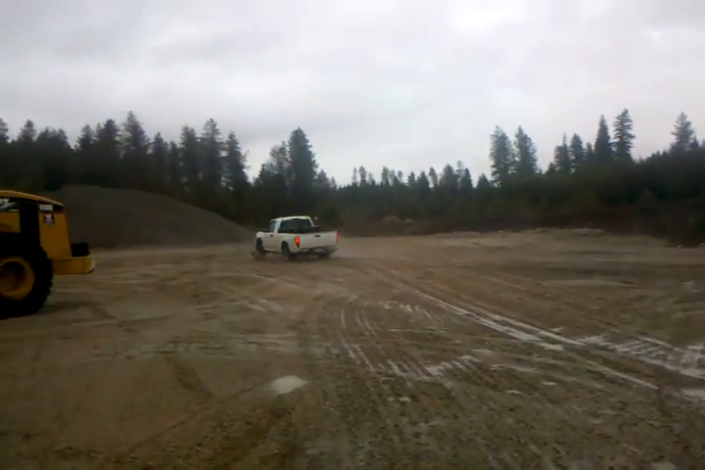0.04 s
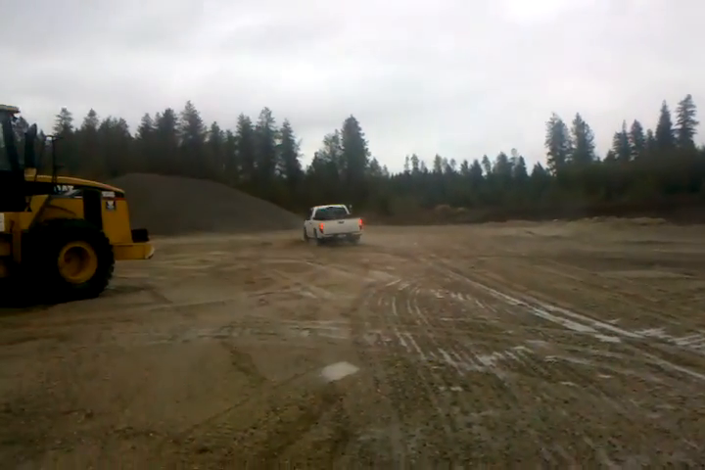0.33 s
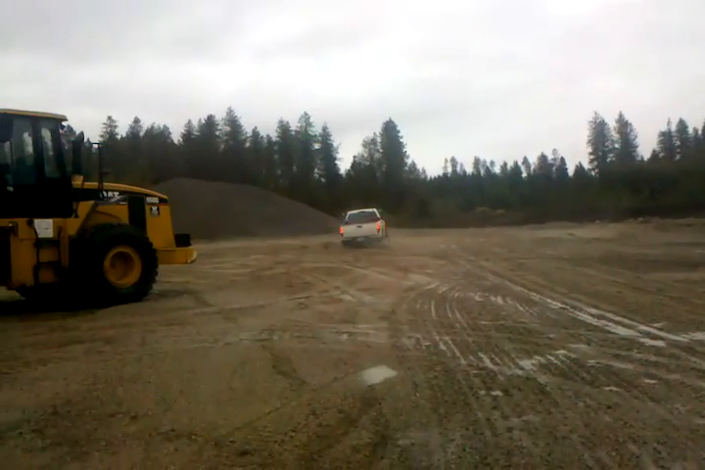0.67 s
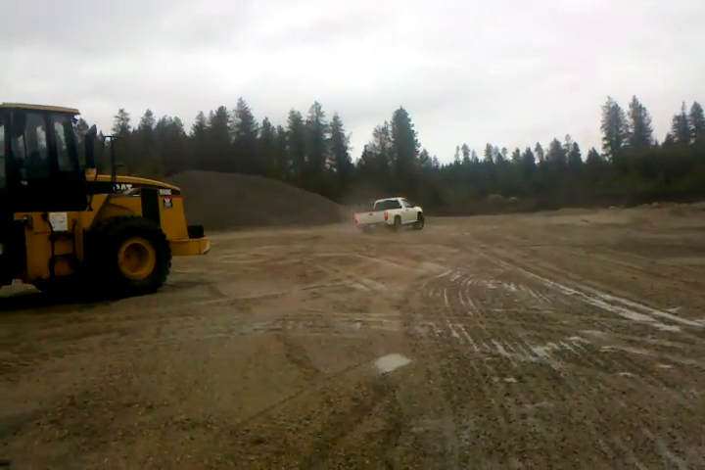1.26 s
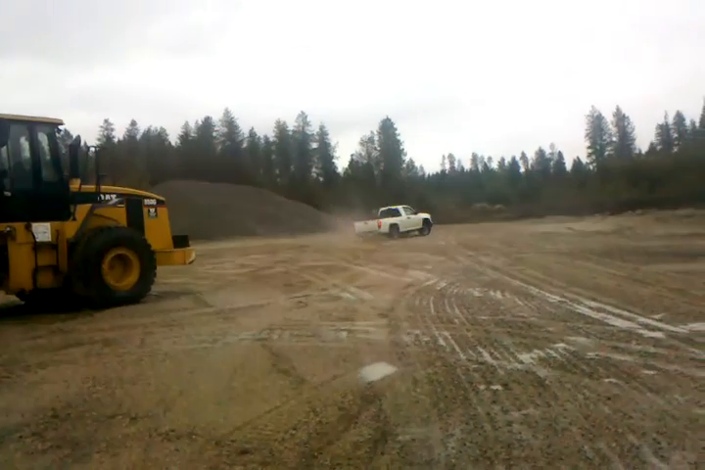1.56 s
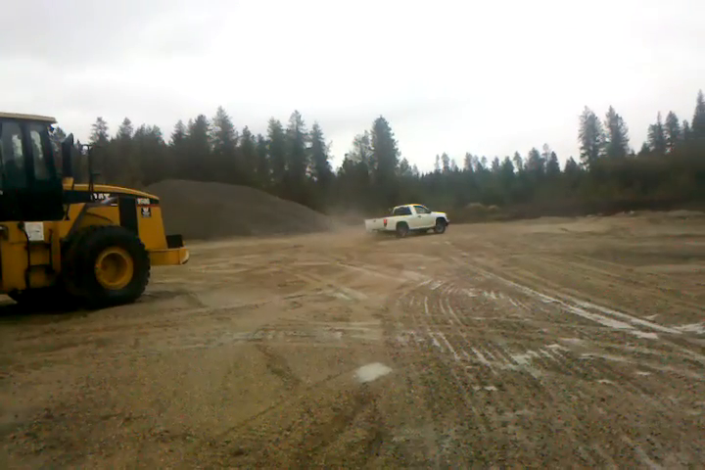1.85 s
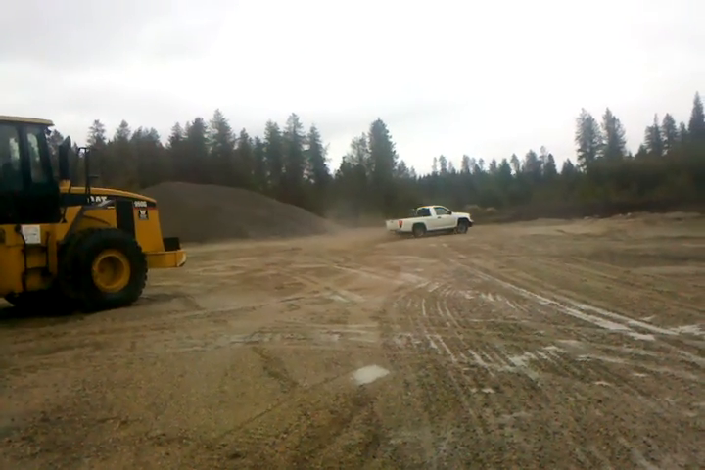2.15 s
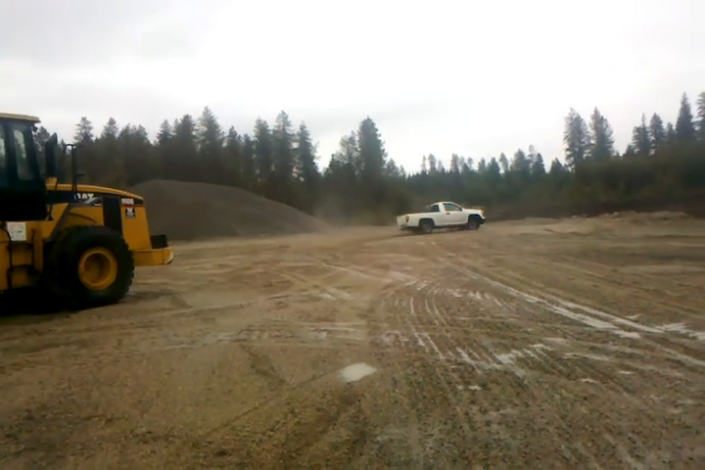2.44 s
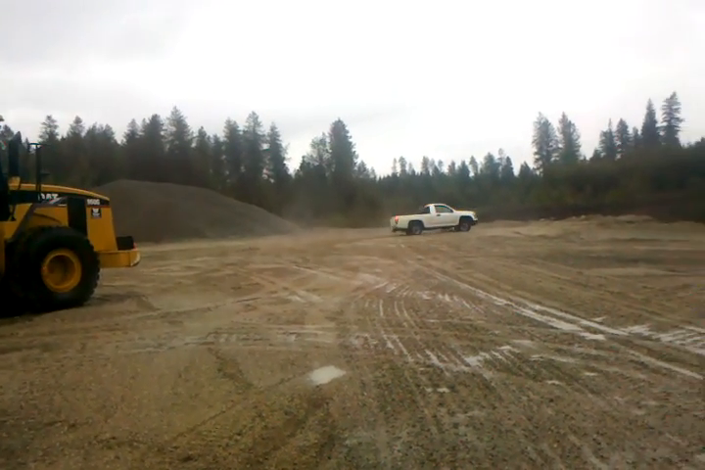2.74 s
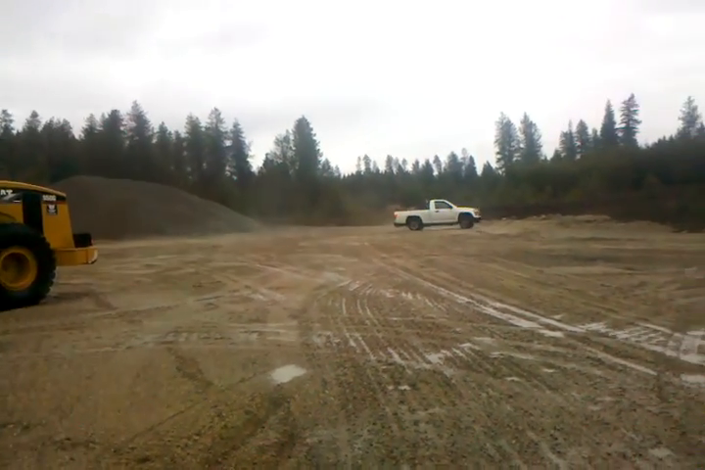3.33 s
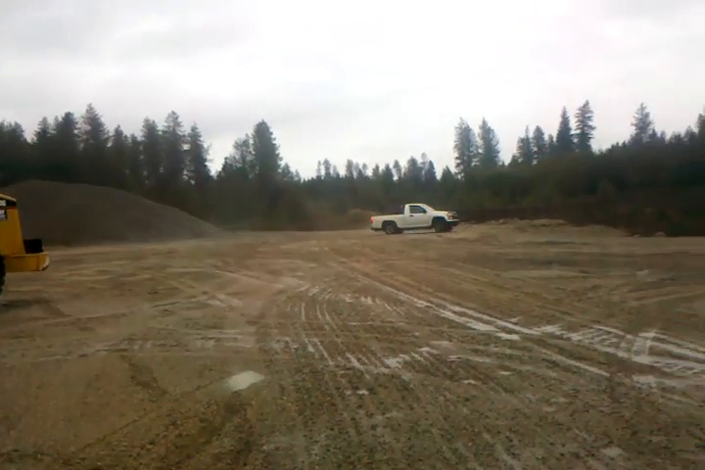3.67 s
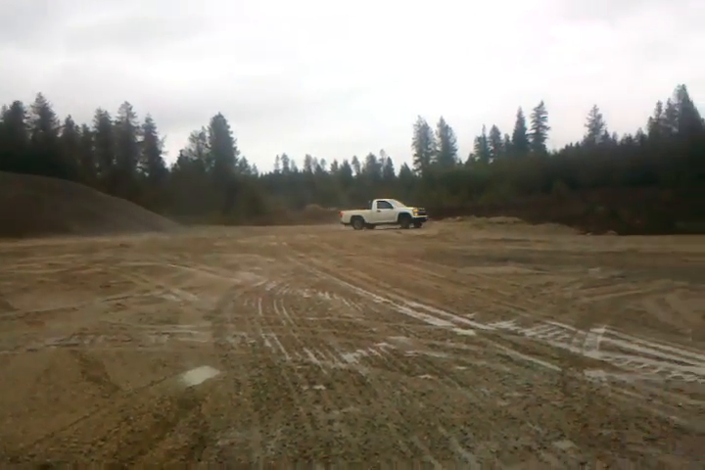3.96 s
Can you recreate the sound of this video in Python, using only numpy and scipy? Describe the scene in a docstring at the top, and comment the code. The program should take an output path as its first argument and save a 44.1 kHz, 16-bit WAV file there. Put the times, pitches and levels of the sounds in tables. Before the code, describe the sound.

A pickup truck powers through a turn on loose dirt, spraying gravel, then coasts.

```python
"""A pickup truck powers through a turn on a loose dirt lot, some way off. From the start its exhaust
drones under the rush of engine air and the roar of tyres churning dirt, and gravel sprays. Soon ruts
knock and single stones clack, while a hollow in the treble slides down. After 2.5 s the throttle
closes and the drone sinks; the truck coasts out over gravel, leaving a faint hiss of wind.
Throughout, the ground reflection hollows the low mids, and a gravel heap and trees return dull echoes."""
import sys
import numpy as np
from scipy import signal
from scipy.fft import rfft, irfft
from scipy.io import wavfile

SR = 44100
rng = np.random.default_rng(int(sys.argv[2]) if len(sys.argv) > 2 else 0)


def store_wav(level_fs):
    """Save 16-bit WAV to argv[1]."""
    pcm = np.round(np.clip(np.atleast_2d(level_fs), -1, 1) * 32767)
    wavfile.write(sys.argv[1], SR, pcm.T.astype(np.int16))


N = 176400
T = np.arange(N) / SR

# the engine's note: time_s, firing_rate_hz, level_db
ENGINE_NOTE = [(0, 129.6, -37.5), (.15, 138, -41), (.34, 137.8, -45.5), (.49, 135.7, -48),
               (.59, 148.7, -46), (.75, 153.9, -46.5), (1.0, 159, -51.5), (1.35, 165.9, -50.5),
               (2.0, 166.8, -69.5), (2.35, 163.5, -46), (2.57, 143.4, -45), (2.7, 127.6, -64),
               (3.1, 94.1, -72), (4, 79.8, -76.5)]


def from_db(db):
    """Decibels to amplitude gain."""
    return 10 ** (np.asarray(db) / 20)


def rms_one(x):
    """Scale to rms 1."""
    return x / np.sqrt(np.mean(x ** 2) + 1e-20)


def in_time(rows):
    """Linear interpolation between timed rows; one array per value column."""
    time_s, *columns = np.transpose(rows)
    return [np.interp(T, time_s, column) for column in columns]


def drift(rate_hz):
    """Low-passed noise: a slow random wander of spread 1."""
    pole = np.exp(-80 * np.pi * rate_hz / SR)
    slow = signal.lfilter([1], [1, -2 * pole, pole * pole], rng.standard_normal(N // 40 + 2002))[2000:]
    return np.interp(np.arange(N) / 40, np.arange(len(slow)), rms_one(slow))


def coloured(x, spectrum):
    """Source and filter: impose a spectrum that falls 18 dB an octave beyond its ends; rms 1."""
    hz, db = np.transpose(spectrum)
    bins_hz = np.maximum(np.fft.rfftfreq(N, 1 / SR), 1)
    octaves_outside = np.abs(np.log2(bins_hz / np.clip(bins_hz, hz[0], hz[-1])))
    gain = from_db(np.interp(np.log(bins_hz), np.log(hz), db) - 18 * octaves_outside)
    return rms_one(irfft(rfft(x) * gain, N))


def grit(per_s, spread_db, share):
    """Shot noise: random impacts carry a share of the power, a wash of finer ones the rest."""
    sizes = from_db(spread_db * np.minimum(rng.exponential(1, N), 5)) * rng.choice([-1, 1], N)
    clicks = rms_one(sizes * (rng.random(N) < per_s / SR))
    return np.sqrt(share) * clicks + np.sqrt(1 - share) * rng.standard_normal(N)


def ring(clicks, hz, t60_s):
    """Damped resonator: each click starts an exponentially decaying sine."""
    radius, angle = from_db(-60 / (t60_s * SR)), 2 * np.pi * hz / SR
    return signal.lfilter([0, np.sin(angle)], [1, -2 * radius * np.cos(angle), radius ** 2], clicks + 1e-18)


def firing_phase(jitter=0.0033):
    """Phase is the integral of frequency, here a slightly unsteady firing rate."""
    rate_hz, _ = in_time(ENGINE_NOTE)
    return 2 * np.pi * np.cumsum(rate_hz * (1 + jitter * drift(7.6))) / SR


def exhaust(phase, flutter_db=0.9):
    """Periodic firing radiates a harmonic series built on half the firing rate."""
    # exhaust orders: firing_rate_multiple, gain_db
    orders = [(.5, -25), (1, -1.5), (1.5, -18), (2, -12), (3, -25)]
    _, level_db = in_time(ENGINE_NOTE)
    drone = np.zeros(N)
    for multiple, gain_db in orders:
        amplitude = np.sqrt(2) * from_db(level_db + gain_db + flutter_db * drift(9))
        drone += amplitude * np.sin(multiple * phase + 2 * np.pi * rng.random())
    return drone


def air_rush(phase, firing_depth=0.17, flutter_db=1.43):
    """Turbulent air in the engine and its fan, amplitude-modulated by each firing."""
    # strength of the rush: time_s, level_db
    levels = [(0, -34.5), (.085, -34.5), (.16, -32), (.23, -35), (.35, -38), (.44, -35.5), (.51, -37),
              (.6, -36.5), (.8, -45.5), (1.1, -52.5), (1.3, -43), (1.55, -51), (1.8, -46.5), (2.05, -37),
              (2.2, -40), (2.42, -38), (2.7, -44.5), (3.15, -56), (4, -63.5)]
    # its spectrum: frequency_hz, density_db
    spectrum = [(600, -23), (1000, 0.5), (1400, 2.5), (1800, 1), (2250, 0), (2700, -8.5), (3200, -12.5),
                (3750, -11.5), (4400, -19), (6000, -24)]
    pulsing = rng.standard_normal(N) * (1 + firing_depth * np.sin(phase))
    return coloured(pulsing, spectrum) * from_db(in_time(levels)[0] + flutter_db * drift(15))


def tyres(lump_db=0.5):
    """Impact and friction noise: treads tear up clods, scrape and roll out, all in uneven lumps."""
    # strength of each contact: time_s, level_db
    churn_levels = [(0, -33.5), (.09, -42), (.15, -35), (.5, -39.5), (.59, -36.5), (.68, -38.5),
                    (.95, -37.5), (1.14, -36.5), (1.24, -33), (1.33, -34.5), (1.7, -33), (2.04, -33.5),
                    (2.18, -37.5), (2.48, -33.5), (2.67, -40), (3.07, -49.5), (3.3, -49), (3.55, -54),
                    (4, -58)]
    scrape_levels = [(0, -38.5), (.17, -43.5), (.3, -45), (.45, -57), (.62, -57), (.8, -65), (1.2, -64)]  # loud while the spinning rear tyres point at the listener
    roll_levels = [(3.2, -77), (3.65, -60), (3.85, -52.5), (4, -56.5)]  # a distant rasp over gravel
    # their spectra: frequency_hz, density_db
    churn_spectrum = [(350, -15.5), (500, -7.5), (650, -2), (820, 1), (1050, -2.5), (1400, -7),
                      (2100, -11.5), (2900, -22.5), (4500, -29.5)]
    scrape_spectrum = [(900, -11.5), (1500, -1.5), (2250, 4.5), (2800, 3), (3600, -2), (4400, -7),
                       (5200, -18)]
    roll_spectrum = [(1200, -18), (1800, 2), (2150, 3.5), (2500, 1), (3200, -16.5)]
    lumps_db = lump_db * drift(23)
    churn = coloured(grit(per_s=1700, spread_db=1.5, share=0.37), churn_spectrum)
    scrape = coloured(grit(per_s=2500, spread_db=6.5, share=0.78), scrape_spectrum)
    roll = coloured(rng.standard_normal(N), roll_spectrum)
    return (churn * from_db(in_time(churn_levels)[0] + lumps_db)
            + scrape * from_db(in_time(scrape_levels)[0] + lumps_db)
            + roll * from_db(in_time(roll_levels)[0] + lumps_db))


def rumble(lump_db=1):
    """Random vibration of the rolling truck radiates low-frequency noise."""
    # strength of the rumble: time_s, level_db
    levels = [(0, -43), (.12, -44), (.75, -46.5), (1.3, -44.5), (2.03, -42.5), (2.25, -46.5), (2.5, -43.5),
              (2.9, -53), (3.2, -53), (3.55, -60), (4, -63)]
    # its spectrum: frequency_hz, density_db
    spectrum = [(30, -40.5), (55, -28), (76, -14.5), (110, -9.5), (170, 0), (220, -1), (290, -0.5),
                (400, -6), (600, -15), (1000, -27)]
    return coloured(rng.standard_normal(N), spectrum) * from_db(in_time(levels)[0] + lump_db * drift(23))


def gravel_spray(clump_db=1.5):
    """The impacts of fine grains thrown by the tyres merge into bright shot noise."""
    # strength of the spray: time_s, level_db
    levels = [(0, -46), (.2, -43), (.45, -47), (.62, -41.5), (.82, -46), (1.16, -44.5), (1.22, -38),
              (1.55, -42), (1.94, -41), (2.22, -47), (2.41, -40), (2.6, -47.5), (2.78, -45.5),
              (2.85, -54.5), (3.1, -61), (3.6, -56), (4, -60)]
    # its spectrum: frequency_hz, density_db
    spectrum = [(2500, -21), (3300, -13.5), (3850, -3), (4300, -9.5), (4900, -4), (5500, 0), (6200, -3),
                (6750, 0.5), (7400, -2)]
    grains = coloured(grit(per_s=5000, spread_db=2, share=0.49), spectrum)
    return grains * from_db(in_time(levels)[0] + clump_db * drift(11))


def wind():
    """Turbulence over the lot makes a faint, smooth broadband hiss."""
    # strength of the hiss: time_s, level_db
    levels = [(0, -62), (1, -53.5), (3.1, -50.5), (3.55, -51), (3.9, -50), (4, -51.5)]
    # its spectrum: frequency_hz, density_db
    spectrum = [(60, -11.5), (150, -7.5), (800, -3), (1400, -11.5), (2150, 1.5), (2800, -5.5), (3500, -8.5),
                (4400, -4.5), (5600, 1), (6300, -1), (7000, -2.5)]
    return coloured(rng.standard_normal(N), spectrum) * from_db(in_time(levels)[0])


def ruts(rise_s=0.013):
    """A wheel striking a rut makes a damped transient: a dull band of noise that swells and dies."""
    # knocks: peak_s, peak_rms_db, centre_hz
    knocks = [(.155, -35, 1090), (1.235, -37, 828), (2.395, -39, 284), (2.741, -43.5, 272),
              (2.877, -40.5, 866), (2.985, -42.5, 880)]
    out = np.zeros(N)
    for peak_s, level_db, centre_hz in knocks:
        age = np.maximum((T - peak_s) / rise_s + 1, 0)  # 1 at the peak
        band = signal.butter(2, [centre_hz / 1.25, centre_hz * 1.25], "band", fs=SR, output="sos")
        body = rms_one(signal.sosfilt(band, rng.standard_normal(N)))
        out += from_db(level_db) * age * np.exp(1 - age) * body
    return out


def stones(scatter_decay_s=0.010, scatter_db=-10):
    """Impact excitation: each stone rings briefly at one frequency and scatters smaller chips."""
    # stone strikes: start_s, level_db, pitch_hz
    strikes = [(.238, -31, 5200), (.657, -26, 6500), (0.999, -31, 5600), (1.005, -29, 6600),
               (1.903, -32.5, 6600), (1.93, -21, 6750), (2.265, -28, 6800), (2.402, -29, 5600),
               (2.411, -28.5, 6600), (2.492, -25.5, 6500), (2.57, -32, 6700)]
    # spectrum of the chips: frequency_hz, density_db
    spectrum = [(4000, -12.5), (5300, -4), (6700, -0.5), (9000, -4.5)]
    chips = coloured(grit(per_s=2500, spread_db=3.5, share=0.42), spectrum)
    out = np.zeros(N)
    for start_s, level_db, pitch_hz in strikes:
        scatter = (T >= start_s) * np.exp(-np.abs(T - start_s) / scatter_decay_s) * chips
        clack = ring(np.arange(N) == int(start_s * SR), pitch_hz, t60_s=0.004)
        out += from_db(level_db) * (clack + from_db(scatter_db) * scatter)
    return out


def treble_hollow(x, width_hz=520, depth=0.49):
    """A time-varying filter: a shallow notch glides down as the truck turns."""
    # path of the notch: time_s, centre_hz
    glide = [(0, 5350), (.2, 5260), (.45, 4800), (.7, 4332), (2.4, 4100), (3.2, 3708)]
    centre_hz, = in_time(glide)
    notched, state = np.zeros(N), np.zeros(2)
    for block in np.array_split(np.arange(N), 400):
        hz = centre_hz[block[0]]
        notch = signal.iirnotch(hz, hz / width_hz, fs=SR)
        notched[block], state = signal.lfilter(*notch, x[block], zi=state)
    return x + depth * (notched - x)


def open_lot(x, echo_cutoff_hz=2000, notch_hz=489, width_hz=113, depth=0.58):
    """Far reflections return dull; destructive interference with the ground reflection cuts a dip."""
    # echoes from the gravel heap and the trees: delay_s, gain_db
    echoes = [(.083, -16.5), (.21, -18.5)]
    dull = signal.sosfilt(signal.butter(2, echo_cutoff_hz, fs=SR, output="sos"), x)
    x = x + sum(from_db(gain_db) * np.interp(T - delay_s, T, dull, left=0) for delay_s, gain_db in echoes)
    notched = signal.lfilter(*signal.iirnotch(notch_hz, notch_hz / width_hz, fs=SR), x)
    return x + depth * (notched - x)


def scene():
    """Superposition of the truck and the wind, heard across the lot."""
    phase = firing_phase()
    truck = exhaust(phase) + air_rush(phase) + tyres() + rumble() + ruts() + gravel_spray() + stones()
    return open_lot(treble_hollow(truck) + wind())[None]


def record(dry):
    """Band limiting: little deep bass; treble cut steeply near 7 kHz, with a faint trace up to 9 kHz."""
    low_hz, top_hz, leak_db, cutoff_hz = 73.4, 6880, -33.5, 9100
    thin = signal.sosfilt(signal.cheby1(5, .5, low_hz, "high", fs=SR, output="sos"), dry)
    dull = signal.sosfilt(signal.cheby1(10, .3, top_hz, fs=SR, output="sos"), thin)
    ceiling = signal.ellip(10, .3, 80, cutoff_hz, fs=SR, output="sos")
    return signal.sosfilt(ceiling, dull + from_db(leak_db) * thin)


dry = scene()
out = record(dry)
store_wav(out)
```